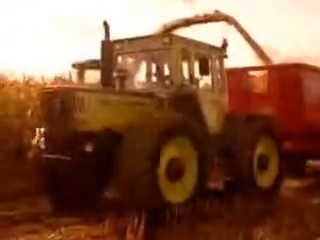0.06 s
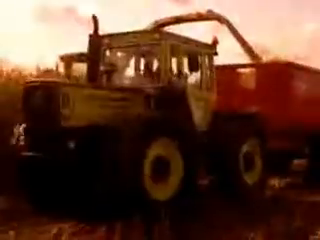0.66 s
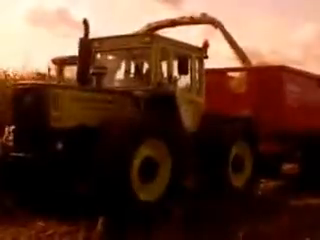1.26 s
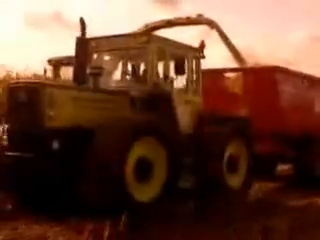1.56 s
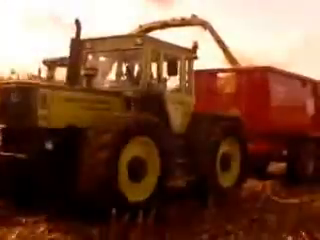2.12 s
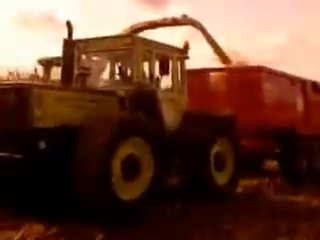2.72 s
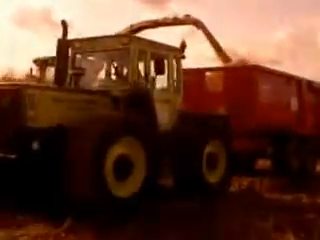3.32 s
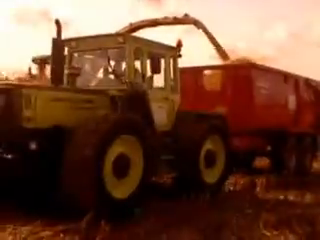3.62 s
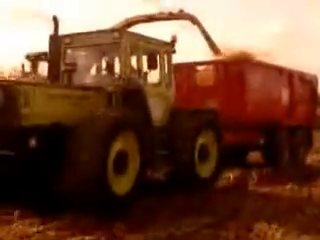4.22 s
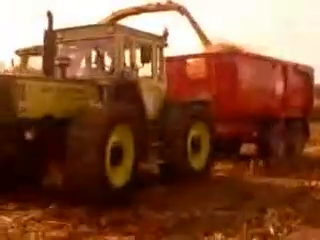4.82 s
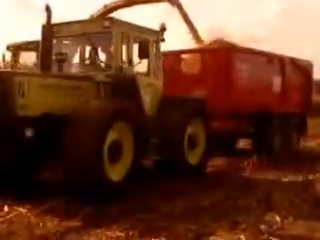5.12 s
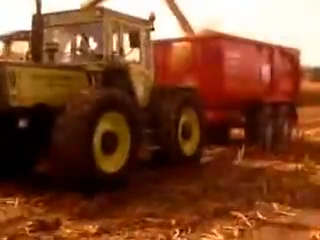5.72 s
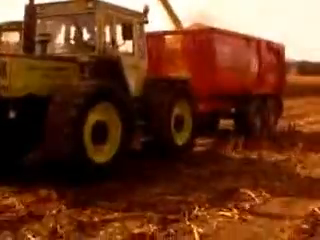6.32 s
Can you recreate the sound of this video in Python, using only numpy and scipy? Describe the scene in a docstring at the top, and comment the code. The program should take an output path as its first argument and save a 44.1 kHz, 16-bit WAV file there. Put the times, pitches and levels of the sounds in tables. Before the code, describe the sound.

Close by in a field, a tractor's diesel runs under a harvester's swelling drone, whine and rush of blown crop.

```python
"""Maize harvest, close by

Open field, no echo. A forage harvester blows chopped maize into a trailer that a tractor pulls alongside.
Its drone swells and fades over the tractor's six-cylinder diesel; the drives clatter and whine, crop
rushes through the steel spout, and the trailer knocks once. A small, dull microphone, close to both
machines, overloads on the loudest swells."""
import sys
import numpy as np
from scipy import signal
from scipy.fft import rfft, irfft, next_fast_len
from scipy.io import wavfile
from scipy.ndimage import uniform_filter1d, minimum_filter1d

SR = 44100
rng = np.random.default_rng(int(sys.argv[2]) if len(sys.argv) > 2 else 0)


def generate_wav(signal):
    """Clip the signal to [-1, 1] and save it as 16-bit WAV at the path in sys.argv[1]."""
    frames = np.transpose(np.atleast_2d(signal))
    scaled = np.clip(frames, -1, 1) * 32767
    pcm = np.round(scaled).astype(np.int16)
    wavfile.write(sys.argv[1], SR, pcm)


N = 280476

# The harvester's drone. Each row: time in seconds, pitch in Hz.
DRONE_PITCH = [(0.0, 230.3), (1.1, 227.5), (1.4, 228.6), (1.9, 233.8), (2.2, 227.1), (2.5, 229.7),
               (3.25, 229.5), (3.5, 232.7), (3.65, 230.7), (3.8, 230.6), (4.6, 229.4), (5.2, 225.7),
               (6.0, 231), (6.36, 229.5)]
# Swells of the drone. Each row: start in seconds, length in seconds, level in dB.
DRONE_SWELLS = [(-0.04, .13, -11.5), (0.66, 0.13, -9), (0.874, 0.077, -13.5), (1.29, 0.42, -6),
                (1.733, 0.3, -13.5), (2.036, 0.16, -9), (2.28, 0.05, -10.5), (2.46, 0.064, -10.5),
                (2.638, 0.043, -11), (3.191, .44, -5), (3.663, 0.16, -14.5), (3.946, 0.11, -13.5),
                (4.41, 0.1385, -9), (4.629, 0.09, -11), (4.879, 0.17, -15.5), (5.112, 0.081, -10.5),
                (5.25, 0.076, -14.5), (5.452, 0.095, -14), (5.631, 0.23, -10), (5.857, .22, -7),
                (6.152, 0.11, -8)]
# Colour of the drives' clatter. Each row: frequency in Hz, relative level in dB.
CLATTER_SPECTRUM = [(480, -18.5), (610, -9.5), (700, -2.5), (790, -3), (880, 0.5), (1000, -7),
                    (1300, -18.5)]
# How loud the drives clatter. Each row: time in seconds, level in dB.
CLATTER_LEVELS = [(0.0, -21.5), (1.1, -21.5), (1.55, -25.5), (2.3, -19.5), (2.9, -21.5), (4.2, -19),
                  (5.3, -19), (6.36, -19.5)]
# Resonances of the chopper housing. Each row: centre in Hz, width in Hz, relative level in dB.
HOUSING_MODES = [(980.4, 99, 0), (1111.5, 130, -1)]
# How loud the housing rings. Each row: time in seconds, level in dB.
HOUSING_LEVELS = [(0.0, -18), (0.6, -19), (2.0, -15), (2.8, -20), (3.5, -23), (4.2, -18.5), (4.8, -18.5),
                  (6.0, -27), (6.36, -19.5)]
# Colour of the rushing crop. Each row: frequency in Hz, relative level in dB.
CROP_SPECTRUM = [(800, -12), (1100, -7), (1330, 4.5), (1560, 2.5), (2000, -1.5), (2400, -5.5), (2620, -7.5),
                 (3050, -12), (3600, -23.5), (4200, -46.5), (5000, -46.5)]
# Flow of crop through the spout. Each row: time in seconds, level in dB.
CROP_FLOW = [(0.0, -20), (0.4, -22), (0.85, -17.5), (1.4, -19), (1.9, -18.5), (2.6, -19), (2.95, -18),
             (3.4, -21), (4.2, -17.5), (4.5, -19.5), (5.5, -16.5), (6.36, -17)]
# Resonances of the spout's bend and flap. Each row: centre in Hz, width in Hz, relative level in dB.
BEND_MODES = [(1785, 200, 0), (1983, 130, -2.5)]
FLAP_MODES = [(2176, 130, -0.88), (2340, 232, -0.12)]
# The spout rings louder as it turns toward the microphone. Each row: time in seconds, boost of the bend in dB,
# boost of the flap in dB.
SPOUT_BOOST = [(0.0, -3.5, 0.5), (1.0, -0.5, 2.5), (3.0, 0.5, -1.5), (4.1, 0.5, 2), (5.1, -0.5, -2),
               (5.6, 0, 2), (5.98, 6, -1), (6.3, 3.5, 5.5)]
# Colour of the tractor's exhaust. Each row: frequency in Hz, relative level in dB.
EXHAUST_SPECTRUM = [(20, -29.5), (45, -19.5), (70, -12.5), (96, -6), (120, -10), (140, -9.5), (190, -6.5),
                    (255, 3), (340, 0), (440, -3), (495, -10.5), (600, -17), (900, -24.5)]
# How loud the exhaust roars. Each row: time in seconds, level in dB.
EXHAUST_LEVELS = [(0.0, -14.5), (0.3, -16), (1.15, -17.5), (1.55, -14), (2.6, -19), (3.4, -15), (4.3, -18),
                  (5.2, -16), (5.9, -16.5), (6.36, -17)]
# Clean tones of the diesel. Each row: multiple of the six-firing cycle's rate, relative level in dB.
DIESEL_ORDERS = [(6, -35.5), (12, -23.5), (18, -34), (20, -30.5), (23, -36.5), (42, -37)]
# A hollow knock on the trailer. Each row: start in seconds, peak level in dB.
TRAILER_KNOCKS = [(2.454, -2.5)]


def from_db(db):
    """Decibels to gain."""
    return 10 ** (np.asarray(db) / 20)


def rms_one(x):
    """Scale to an rms of 1."""
    return x / np.sqrt(np.mean(x ** 2) + 1e-20)


def in_time(rows):
    """Each column of a timed table, interpolated to every sample."""
    seconds, *columns = np.transpose(rows)
    return [np.interp(np.arange(N) / SR, seconds, column) for column in columns]


def drift(rate_hz):
    """A random wander with a spread of 1, mostly slower than rate_hz."""
    step = 40
    size = next_fast_len(N // step + 2)
    hz = np.fft.rfftfreq(size, step / SR)
    spectrum = rfft(rng.standard_normal(size)) / (1 + (hz / rate_hz) ** 4)
    return np.interp(np.arange(N) / step, np.arange(size), rms_one(irfft(spectrum, size)))


def coloured(x, spectrum):
    """Pass x through a body with this spectrum, falling away beyond its ends; rms 1."""
    points_hz, points_db = np.transpose(spectrum)
    hz = np.maximum(np.fft.rfftfreq(N, 1 / SR), 1)
    gain = from_db(np.interp(np.log(hz), np.log(points_hz), points_db))
    skirts = np.minimum(1, np.minimum(hz / points_hz[0], points_hz[-1] / hz)) ** 3
    return rms_one(irfft(rfft(x) * gain * skirts, N))


def turns_of(hz):
    """Cycles gone by at this rate."""
    return np.cumsum(hz) / SR


def tone(turns):
    """A sine of rms 1 that starts anywhere in its cycle."""
    return np.sqrt(2) * np.sin(2 * np.pi * (turns + rng.random()))


def strokes(turns, per_turn, uneven_db, chance_db):
    """Clicks whose uneven strengths come round on every turn, with random scatter on top."""
    number = np.floor(turns * per_turn).astype(int)
    at = np.flatnonzero(np.diff(number)) + 1
    pattern_db = uneven_db * rng.permutation(np.linspace(-1, 1, per_turn))
    clicks = np.zeros(N)
    clicks[at] = from_db(pattern_db[number[at] % per_turn] + chance_db * rng.standard_normal(N)[at])
    return clicks


def bursts(clicks, decay_s, depth):
    """A gain of rms 1 that jumps at each click and dies away; depth is its share against steady flow."""
    puffs = rms_one(signal.lfilter([1], [1, -np.exp(-1 / (decay_s * SR))], clicks + 1e-18))
    return rms_one(1 - depth + depth * puffs)


def resonance(x, hz, width_hz):
    """Ring x through one damped mode."""
    band = signal.butter(2, [hz - width_hz / 2, hz + width_hz / 2], "band", fs=SR, output="sos")
    return signal.sosfilt(band, x)


def panel(modes, force, patchy_db):
    """Broad resonances, each fed more or less strongly as the crop strikes here or there; rms 1."""
    rings = 0
    for hz, width_hz, db in modes:
        ring = rms_one(resonance(force * rng.standard_normal(N), hz, width_hz))
        rings += ring * from_db(db + patchy_db * drift(24))
    return rms_one(rings)


def throb(turns, swing_db, crest_turn):
    """The load swells once on every turn."""
    return from_db(swing_db * np.cos(2 * np.pi * (turns - crest_turn)))


def swells(lull_db=-22, waver_db=8.5, release_s=.043, flutter_db=1.32):
    """The drone's gain: swells rise out of a wavering lull and fall back, all with a quick flutter."""
    t = np.arange(N) / SR
    gain = from_db(lull_db + waver_db * np.tanh(drift(8)))
    for start, length, db in DRONE_SWELLS:
        attack_s = .045 + .13 * length   # long swells build more slowly
        rise = (t - start) / attack_s
        fall = 1 - (t - start - length) / release_s
        gain = np.maximum(gain, from_db(db) * np.clip(np.minimum(rise, fall), 0, 1))
    return gain * from_db(flutter_db * drift(15))


def harvester_drone(rough_db=1.8, jitter=.01183):
    """The harvester's fast beat: a rough tone that swells and fades, with a weak, wavering octave."""
    pitch_hz, = in_time(DRONE_PITCH)
    gain = swells() * from_db(rough_db * drift(97))
    fundamental = tone(turns_of(pitch_hz * (1 + jitter * drift(40))))
    octave_gain = from_db(-29 + 2.2 * drift(4))
    octave = tone(2 * turns_of(pitch_hz * (.994 + .006 * drift(11.8))))
    return gain * fundamental + octave_gain * octave


def drives(feed_turns, whine_hz=976.5):
    """Gears and chains rattle in step with the feed rollers; the chopper housing rings and whines."""
    housing_db, = in_time(HOUSING_LEVELS)
    clatter_db, = in_time(CLATTER_LEVELS)
    impacts = strokes(feed_turns, per_turn=6, uneven_db=4.5, chance_db=6)
    force = bursts(impacts, decay_s=.0077, depth=.21)
    clatter = coloured(force * rng.standard_normal(N), CLATTER_SPECTRUM)
    whine = tone(turns_of(whine_hz * (1 + .0056 * drift(32))))
    whine *= from_db(-10.5 + 1.8 * drift(15))
    housing = panel(HOUSING_MODES, force, patchy_db=1) + whine
    load = throb(feed_turns, swing_db=1.25, crest_turn=.56)
    return load * (from_db(clatter_db) * clatter + from_db(housing_db) * housing)


def blown_crop(feed_turns, chips_per_s=4000):
    """The rollers feed the stalks in bites; each sprays chips against the steel spout, which rings."""
    flow_db, = in_time(CROP_FLOW)
    bend_boost_db, flap_boost_db = in_time(SPOUT_BOOST)
    bites = strokes(feed_turns, per_turn=6, uneven_db=3, chance_db=2)
    force = bursts(bites, decay_s=.01, depth=.16)
    chips = rms_one((rng.random(N) < chips_per_s / SR) * rng.standard_normal(N))
    spray = force * (rng.standard_normal(N) + from_db(-2.5) * chips)
    stream = from_db(-2) * coloured(spray, CROP_SPECTRUM)
    bend = from_db(-5 + bend_boost_db) * panel(BEND_MODES, force, patchy_db=2.5)
    flap = from_db(-4.5 + flap_boost_db) * panel(FLAP_MODES, force, patchy_db=2.5)
    load = throb(feed_turns, swing_db=.5, crest_turn=.38)
    return from_db(flow_db) * load * (stream + bend + flap)


def tractor(firing_hz=102.4):
    """Six unequal firings a cycle drive the exhaust with a pulse and a puff of turbulent gas each."""
    roar_db, = in_time(EXHAUST_LEVELS)
    cycles = turns_of(firing_hz * (1 + .004 * drift(1.5))) / 6
    pulses = strokes(cycles, per_turn=6, uneven_db=2.5, chance_db=3)
    gas = rng.standard_normal(N) * bursts(pulses, decay_s=.0043, depth=.37)
    roar = rms_one(coloured(gas, EXHAUST_SPECTRUM) + from_db(-16) * coloured(pulses, EXHAUST_SPECTRUM))
    hum = sum(from_db(db - 1 + 2.2 * drift(9)) * tone(order * cycles) for order, db in DIESEL_ORDERS)
    return from_db(roar_db + drift(5.9)) * roar + hum


def trailer_knock():
    """The trailer's wall gives a short, heavily damped bump."""
    clicks = np.full(N, 1e-18)
    for start, db in TRAILER_KNOCKS:
        clicks[round(start * SR)] = from_db(db)
    bump = resonance(clicks, hz=525, width_hz=95)
    return bump * clicks.max() / np.abs(bump).max()


def limiter(x, limit_db=1.82, attack_s=.003, release_db_per_s=70):
    """The recorder's gain drops just ahead of each peak over the limit, then creeps back."""
    attack = int(attack_s * SR)
    recovery_db = release_db_per_s * np.arange(N) / SR
    headroom_db = limit_db - 20 * np.log10(np.abs(x) + 1e-9)
    duck_db = minimum_filter1d(np.minimum(headroom_db, 0), attack)
    gain_db = np.minimum.accumulate(duck_db - recovery_db, axis=-1) + recovery_db
    return x * from_db(uniform_filter1d(gain_db, attack))


def scene():
    """Both machines close by in the open field, in mono, with no echo."""
    feed_hz = 7.633   # turns of the feed rollers a second
    feed_turns = feed_hz * np.arange(N) / SR
    harvester = harvester_drone() + drives(feed_turns) + blown_crop(feed_turns)
    return (harvester + tractor() + trailer_knock())[None]


def record(dry):
    """Small microphone and recorder: peaks are ducked and rounded, treble is lost, overshoots clip."""
    ceiling, microphone_top_hz, recorder_top_hz = 1.07, 4600, 15800
    microphone = signal.cheby1(8, .2, microphone_top_hz, fs=SR, output="sos")
    recorder = signal.cheby1(12, .1, recorder_top_hz, fs=SR, output="sos")
    held = limiter(dry)
    rounded = held / (1 + (np.abs(held) / ceiling) ** 10) ** (1 / 10)
    dull = signal.sosfilt(microphone, rounded)
    clipped = np.clip(dull, -.975, .975)   # a faint crackle
    hiss = from_db(-80) * rng.standard_normal(N)
    return signal.sosfilt(recorder, clipped + hiss)


dry = scene()
out = record(dry)
generate_wav(out)
```